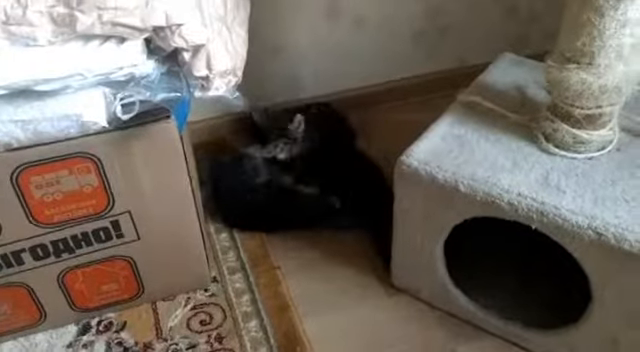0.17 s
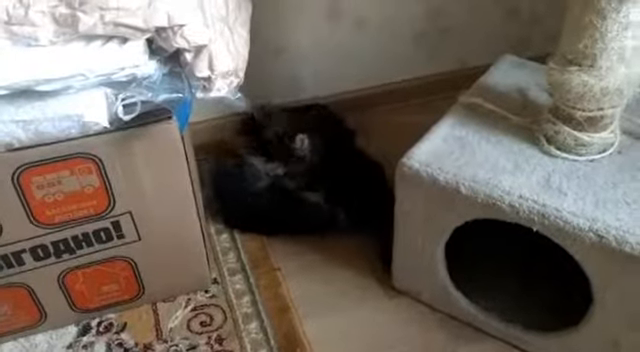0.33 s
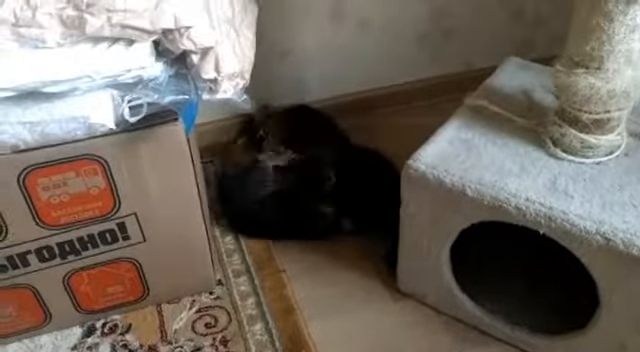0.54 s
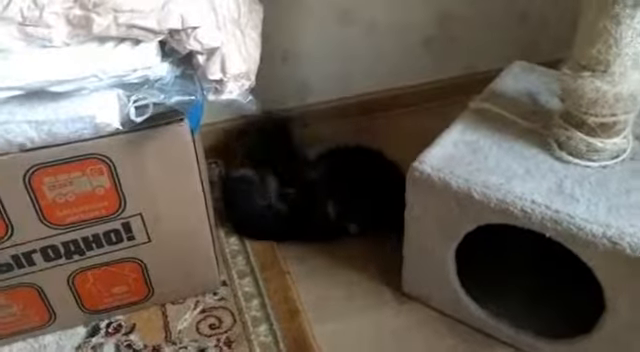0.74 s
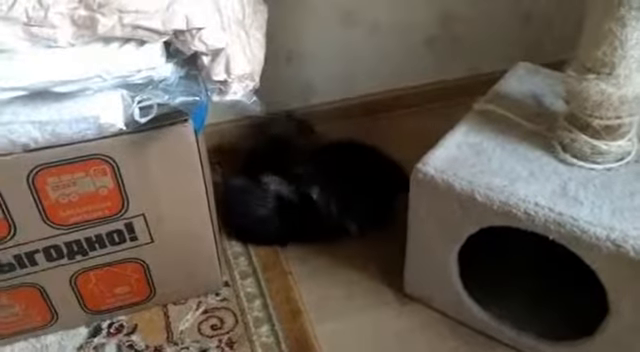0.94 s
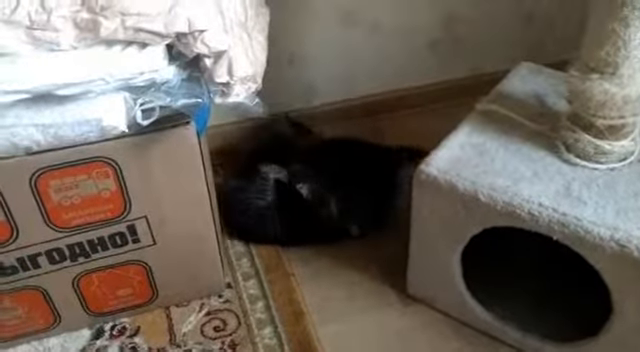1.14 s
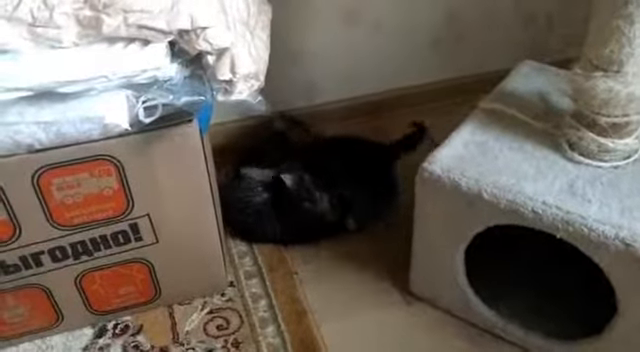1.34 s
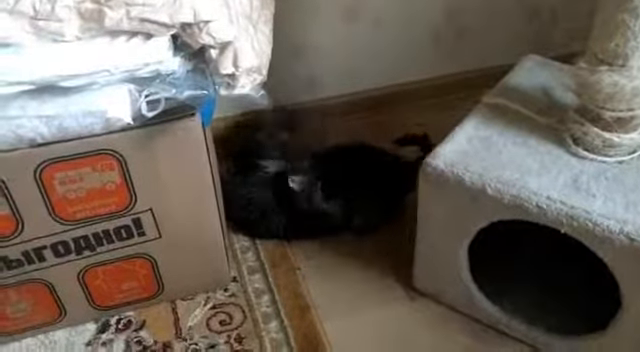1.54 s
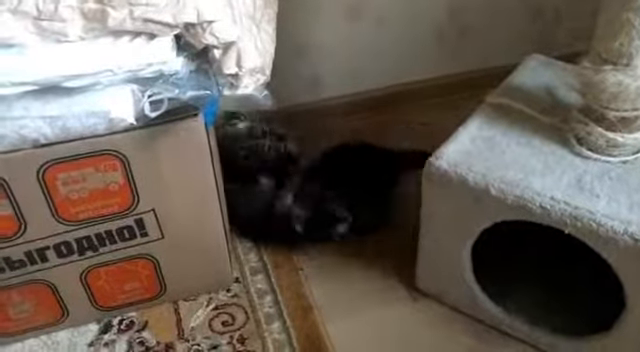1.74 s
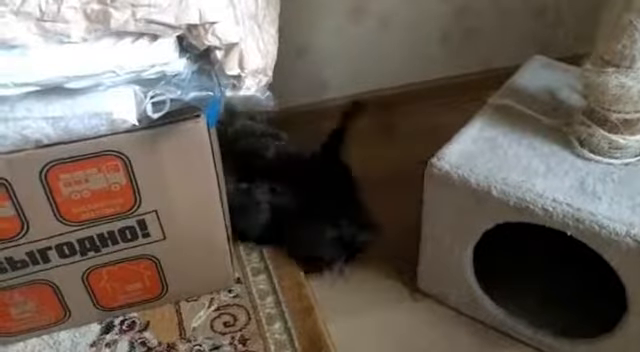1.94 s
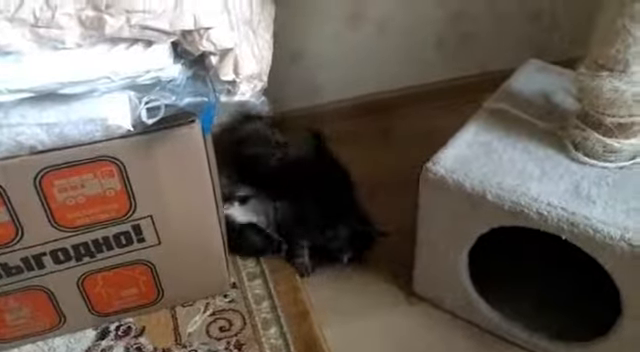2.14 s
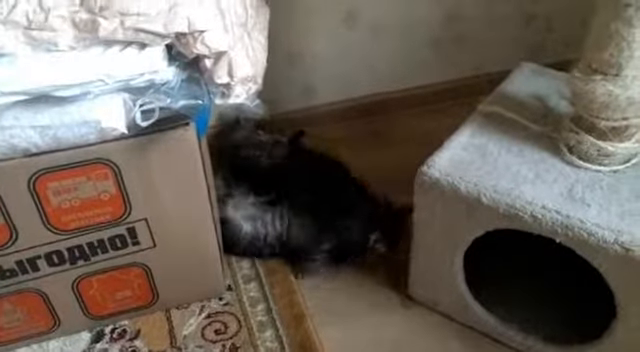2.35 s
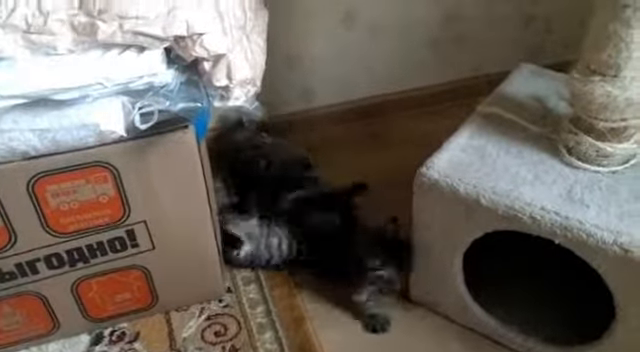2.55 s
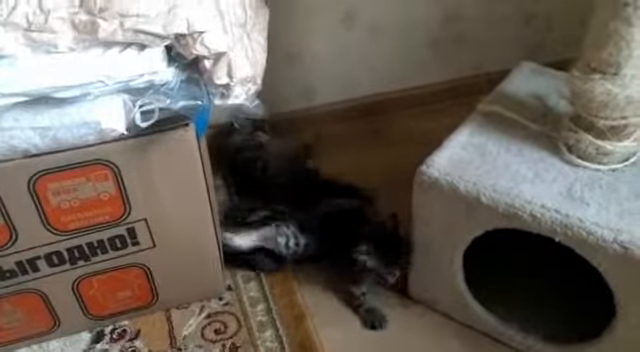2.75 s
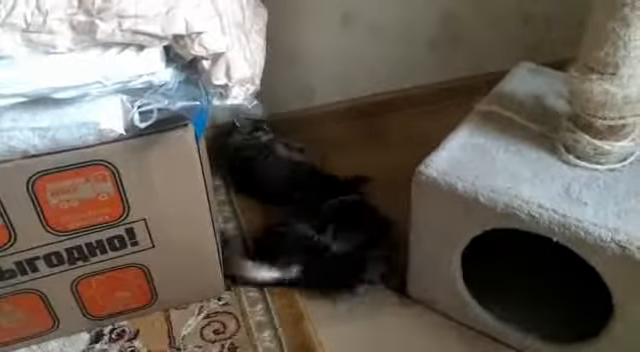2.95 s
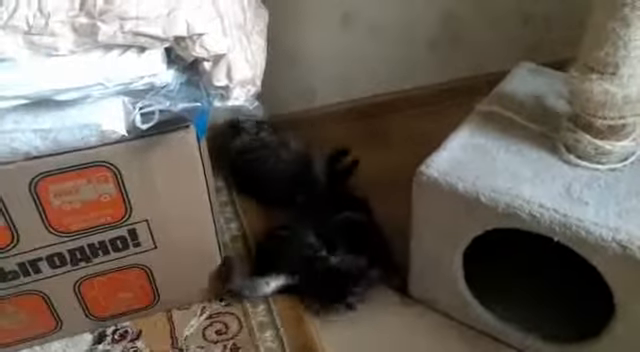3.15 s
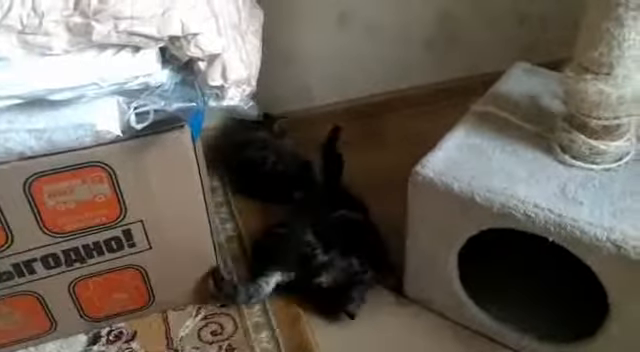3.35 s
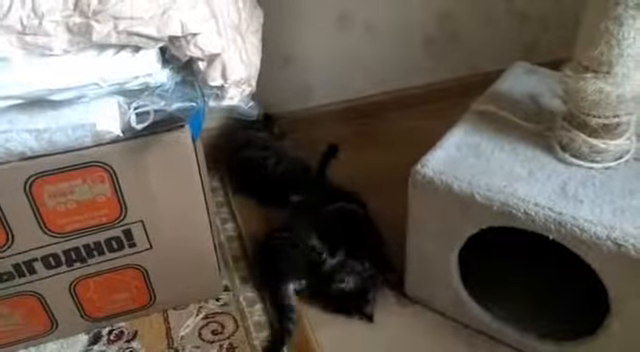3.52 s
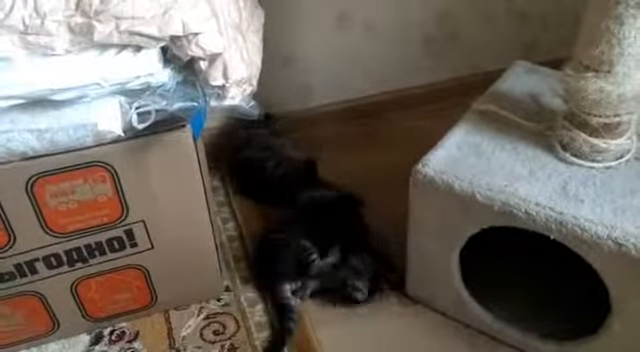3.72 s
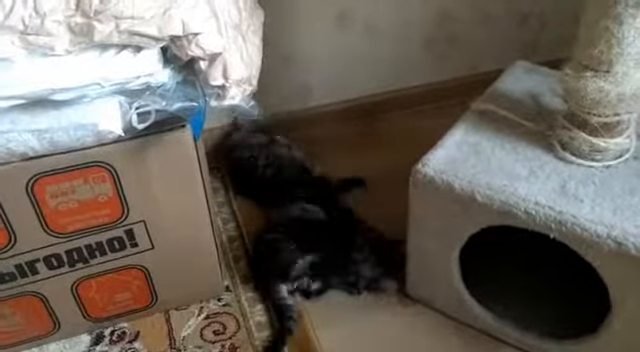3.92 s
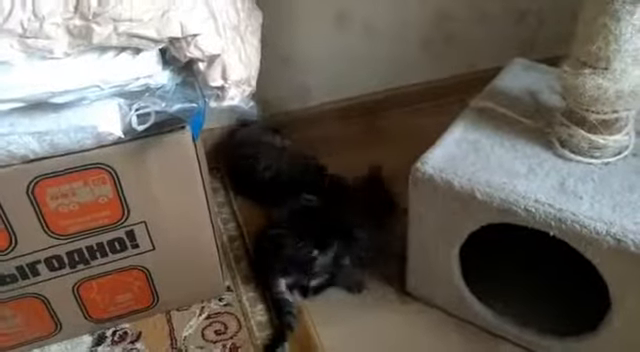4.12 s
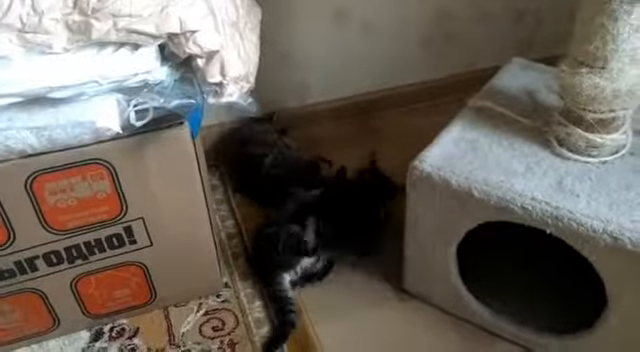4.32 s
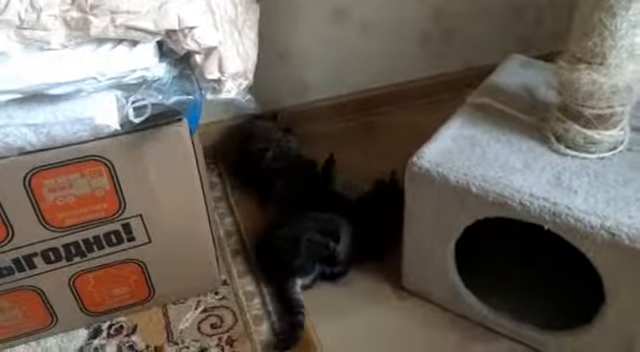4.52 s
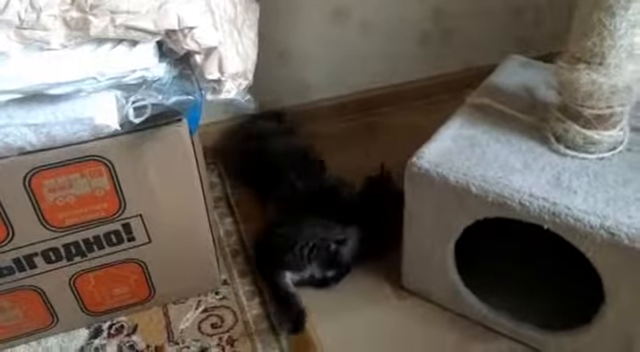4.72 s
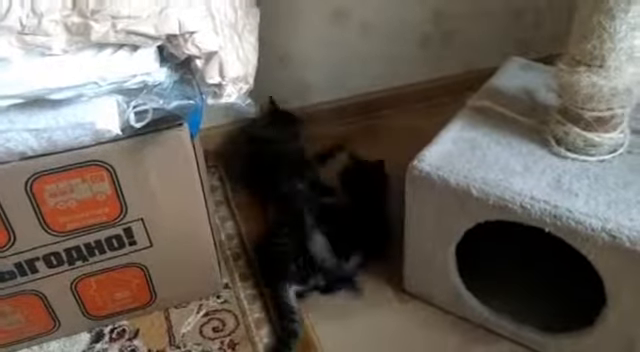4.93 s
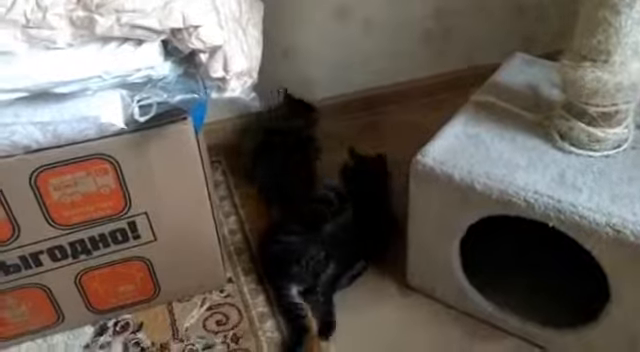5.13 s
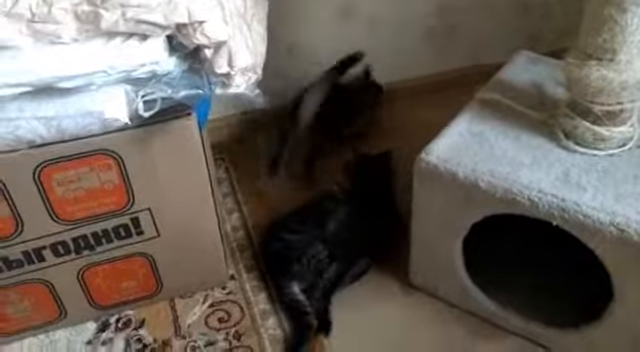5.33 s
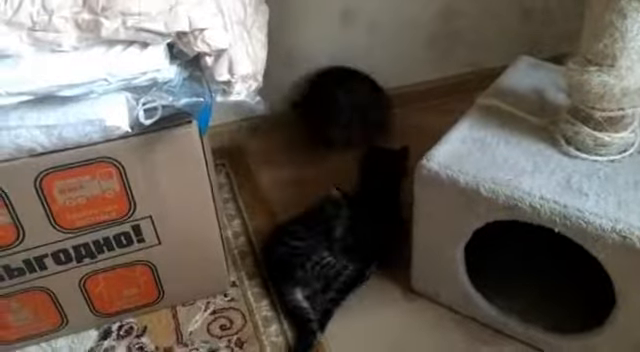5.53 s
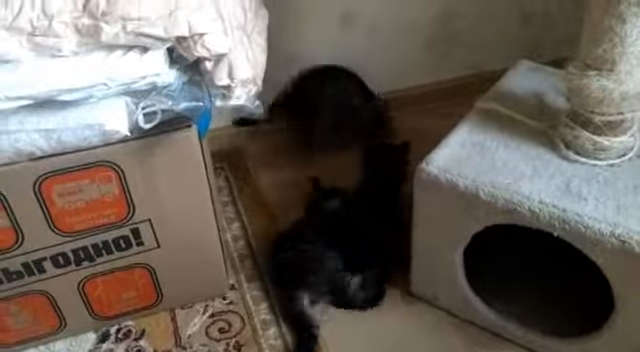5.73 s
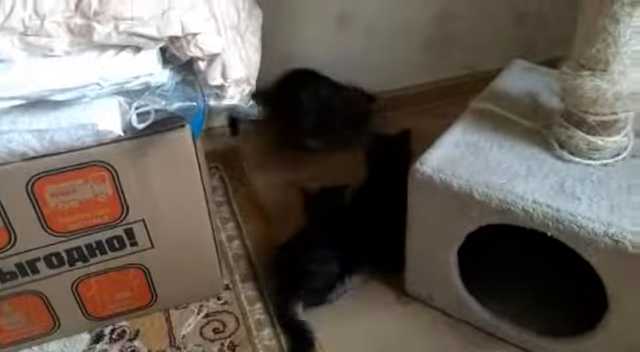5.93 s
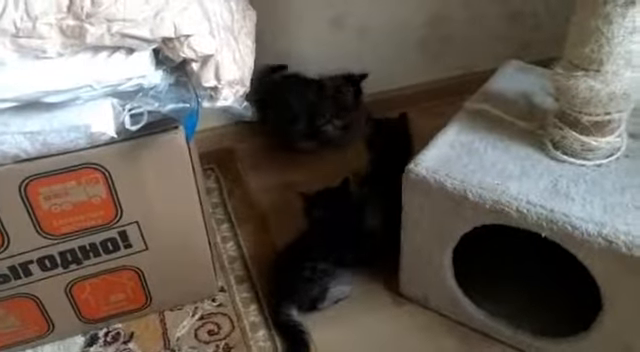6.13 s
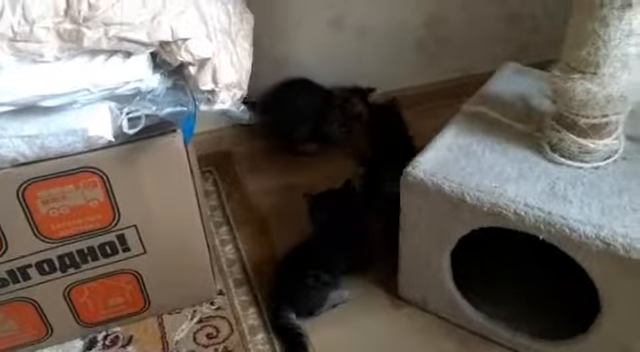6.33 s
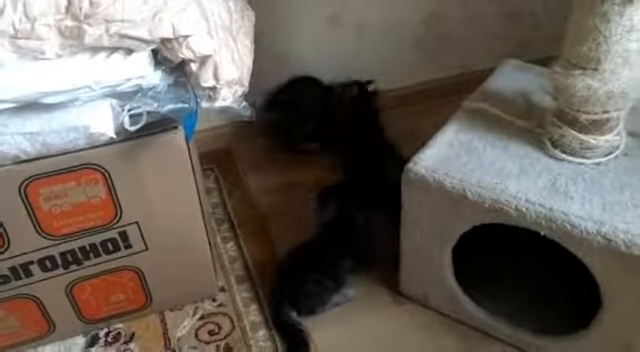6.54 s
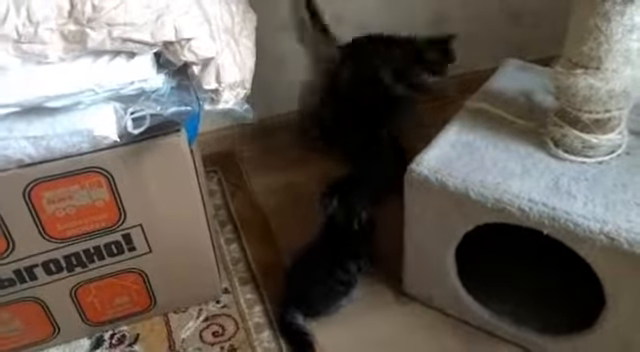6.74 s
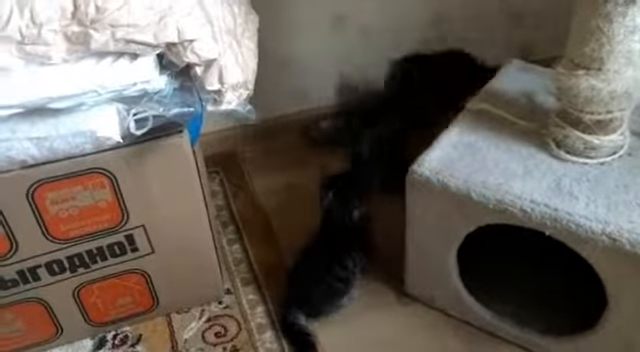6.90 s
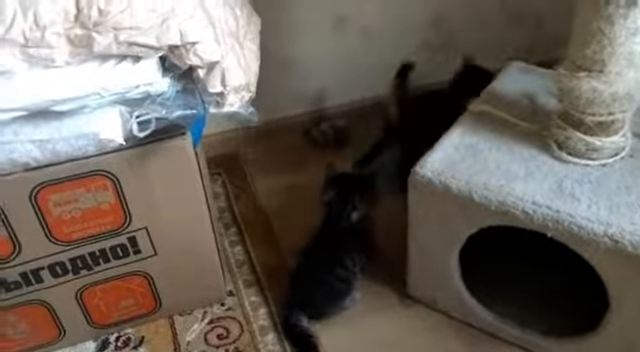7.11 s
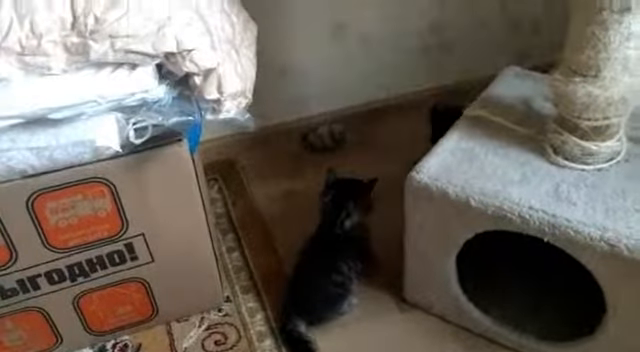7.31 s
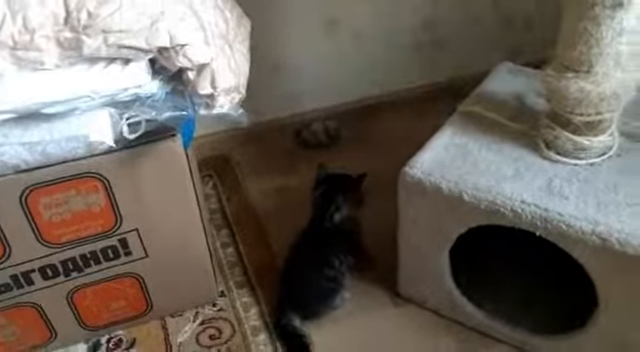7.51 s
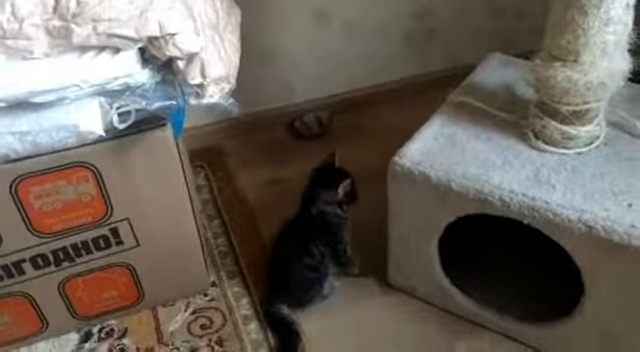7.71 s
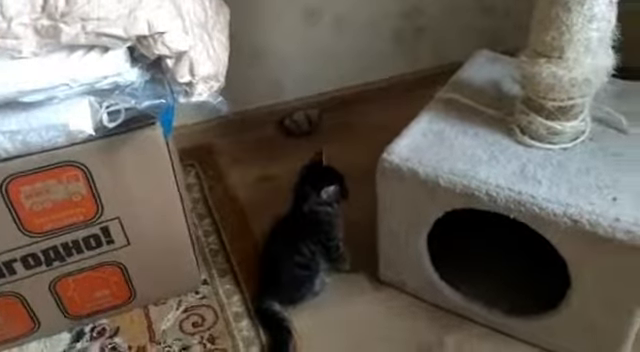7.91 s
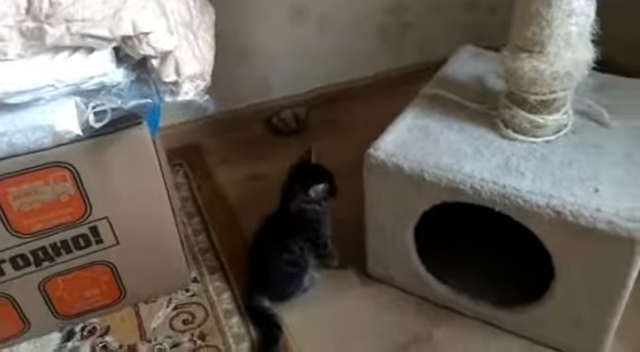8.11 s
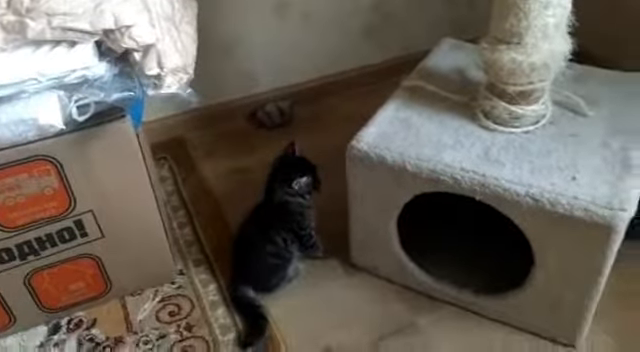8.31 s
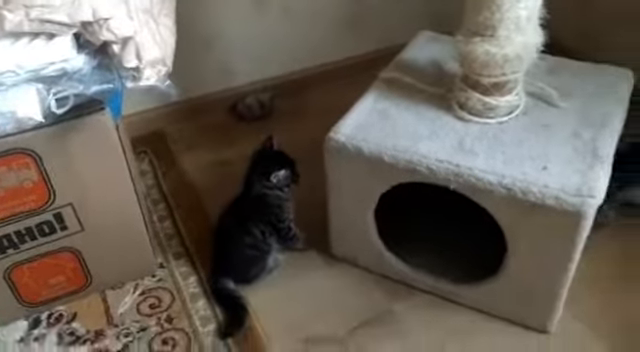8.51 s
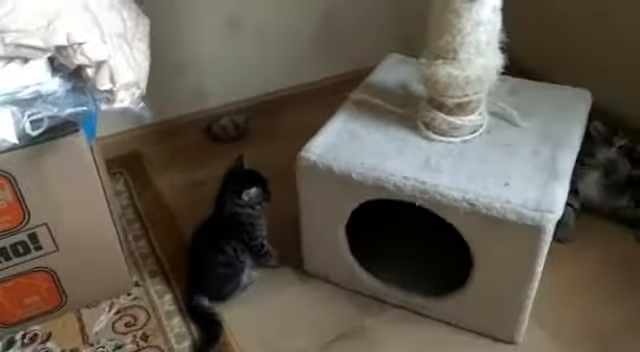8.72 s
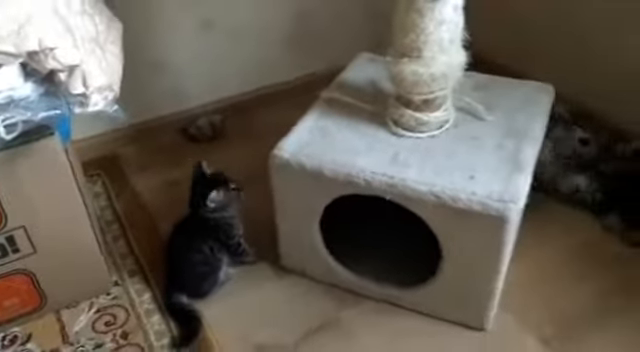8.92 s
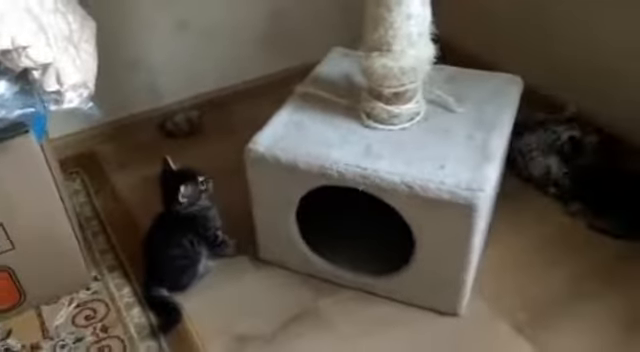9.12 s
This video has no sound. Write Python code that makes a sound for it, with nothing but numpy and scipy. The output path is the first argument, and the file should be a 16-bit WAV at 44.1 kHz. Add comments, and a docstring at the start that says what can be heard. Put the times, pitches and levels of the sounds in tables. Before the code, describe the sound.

Light claws tick and small paws thump on hard flooring as kittens tussle in a quiet live room, busiest in a late scramble.

```python
"""A low wavering hum, steady hiss and a tiny once-a-second tick run throughout, under two kittens wrestling
on a laminate floor: claws tick, feet scuff, hard things knock, paws thump. Early on come a faint squeal
and one low double thump of a body flopping over. Fur rustle grows with the density of contacts.
Contacts are shaped noise or impulses through resonators, each with a small, fairly live room's tail."""
import sys
import numpy as np
from scipy import signal
from scipy.fft import rfft, irfft, next_fast_len
from scipy.io import wavfile
from scipy.ndimage import uniform_filter1d

SR = 44100
rng = np.random.default_rng(int(sys.argv[2]) if len(sys.argv) > 2 else 0)


def materialize(psi):
    """Save the field psi as 16-bit PCM at rate SR to the path in sys.argv[1].

    A 1-D psi becomes a single channel; in a 2-D psi each row is a channel.
    """
    bounded = np.clip(np.atleast_2d(psi).T, -1, 1)
    quanta = np.round(bounded * 32767).astype(np.int16)
    wavfile.write(sys.argv[1], SR, quanta)


N = 403956


def undb(db):
    """Decibels to amplitude gain."""
    return 10 ** (np.asarray(db) / 20)


def seconds(length_s):
    """Time axis of the given length."""
    return np.arange(int(length_s * SR)) / SR


def lookup(points, hz):
    """Read (Hz, value) points on a log-frequency axis."""
    point_hz, value = np.transpose(points)
    return np.interp(np.log(np.maximum(hz, 1)), np.log(point_hz), value)


def colour(x, points):
    """Filter x by a curve of (Hz, dB) points."""
    size = next_fast_len(len(x))
    hz = np.arange(size // 2 + 1) * SR / size
    return irfft(rfft(x, size) * undb(lookup(points, hz)), size)[:len(x)]


def resonate(x, hz, q):
    """One resonance, gain 1 at its centre; Q is at least 0.3."""
    w = 2 * np.pi * min(hz, SR / 2 - 2000) / SR
    a = np.sin(w) / (2 * max(q, 0.3))
    return signal.lfilter([a, 0, -a], [1 + a, -2 * np.cos(w), 1 - a], x)


def unit(x):
    """Scale to rms 1."""
    return x / np.sqrt(np.mean(x ** 2))


def crest(x, db, window_s):
    """Scale so that the loudest window has the given rms level."""
    window = max(int(window_s * SR), 2)
    power = uniform_filter1d(x ** 2, window, mode="constant")
    return x * undb(db) / np.sqrt(power.max())


def walk(rate_hz):
    """Slow smoothed random curve with a spread near 1."""
    k = int(SR / rate_hz)
    steps = np.repeat(rng.standard_normal(N // k + 1), k)
    return unit(uniform_filter1d(uniform_filter1d(steps, k), k)[:N])


def grains(size, spread_db):
    """Dense tiny slips, a few much stronger than the rest."""
    boost = np.minimum(rng.exponential(size=size), 2 * np.pi)
    return unit(rng.standard_normal(size) * undb(spread_db * boost))


def add(out, start_s, x):
    """Mix x in at the given time."""
    i = max(int(start_s * SR), 0)
    out[i:i + len(x)] += x[:max(N - i, 0)]


# room decay: hz, t60_s
ROOM_DECAY = [(120, 0.34), (400, 0.35), (1200, 0.4), (4500, 0.46), (13000, 0.22)]
# reverberation colour: hz, level_db
ROOM_TINT = [(100, 11.5), (500, 5.5), (1500, 1), (4500, 3), (9000, 1), (15000, 11.5)]


def room_tail(onset_s=0.0054):
    """Diffuse echoes of unit energy; each band decays at its own rate, the top band fastest."""
    t = seconds(0.5)
    spectrum = rfft(colour(rng.standard_normal(len(t)), ROOM_TINT))
    hz = np.arange(len(spectrum)) * SR / len(t)
    centres_hz, t60s = np.transpose(ROOM_DECAY)
    tail = 0
    for share, t60_s in zip(np.eye(len(centres_hz)), t60s):
        band = irfft(spectrum * lookup(np.c_[centres_hz, share], hz), len(t))
        tail = tail + band * undb(-60 * t / t60_s)
    # silent until onset_s, full at twice that
    tail = tail * np.clip(t / onset_s - 1, 0, 1)
    return tail / np.linalg.norm(tail)


def in_room(x, wet_db):
    """Direct sound plus its reverberation."""
    response = undb(wet_db) * room_tail()
    response[0] += 1
    return signal.fftconvolve(x, response)


# low hum level, before HUM_TRIM_DB: time_s, level_db
HUM_LEVEL = [(0.0, -76), (0.81, -64), (1.1, -57.5), (1.55, -75), (2.55, -58), (2.78, -66), (4.8, -55.5),
             (5.36, -61), (5.64, -60), (5.84, -69), (6.84, -68), (9.16, -67)]
# still room and microphone hiss, relative spectrum: hz, level_db_per_hz
HISS_SPECTRUM = [(30,-18), (48,-4), (66,3), (86,-11), (135,-6), (200,-21), (380,-26), (700,-29),
                 (1800,-32.5), (4500,-38), (8000,-42), (10600,-31), (14200,-29), (15800,-33)]
HUM_HZ, HUM_TRIM_DB, HISS_DB = 72.9, -2, -60


def background(drone_db=-66, drone_hz=127):
    """Steady noise hiss and rumble, a sine hum wavering in pitch and level, a narrow noise drone above."""
    phase = 2 * np.pi * np.cumsum(HUM_HZ + 2.62 * walk(7.5)) / SR
    hum_db = np.interp(np.arange(N) / SR, *np.transpose(HUM_LEVEL)) + HUM_TRIM_DB + 2 * walk(8.6)
    hum = np.sqrt(2) * np.sin(phase) * undb(hum_db)
    drone = unit(resonate(resonate(rng.standard_normal(N), drone_hz, 2.8), drone_hz, 2.8))
    hiss = unit(colour(rng.standard_normal(N), HISS_SPECTRUM))
    return hum + undb(drone_db) * drone + undb(HISS_DB) * hiss


# fur rubbing on fur, carpet and cardboard: hz, level_db
FUR_SPECTRUM = [(150, 9), (400, 6.5), (1000, -1), (2500, -6), (4600, -7), (7500, -8.5), (12000, -7.5),
                (15500, -16)]
# calm level, rise per doubling of (1 + bustle), time over which contacts blend
CALM_DB, BUSTLE_DB, BUSTLE_S = -67.5, 2.5, 0.32


def tussle(flutter_db=1.0):
    """Two small bodies rolling over each other: a restless rustle, louder as contacts crowd together."""
    contacts, span = np.zeros(N), int(BUSTLE_S * SR)
    for time_s, *_ in PAW_LANDINGS + CLAW_STRIKES + FOOT_SCUFFS:
        add(contacts, time_s, np.ones(1))
    per_second = SR * uniform_filter1d(uniform_filter1d(contacts, span), span)
    bustle = np.log2(1 + per_second * BUSTLE_S)
    rustle = unit(colour(grains(N, 2.53), FUR_SPECTRUM))
    return rustle * undb(CALM_DB + BUSTLE_DB * bustle + flutter_db * walk(30))


def phone_ticks(db=-46, hz=13500, q=2.3, click_db=-7):
    """The phone's electronics leave a tiny high tick about once a second, and one out of step."""
    out, impulse = np.zeros(N), 1. * (seconds(0.004) == 0)
    ring, click = unit(resonate(impulse, hz, q)), unit(resonate(impulse, 15000, 0.2))
    tick = crest(ring + undb(click_db) * click, db, 0.001)
    for start_s in [*np.arange(0.0296, N / SR, 1.00415), 3.6188]:
        add(out, start_s, tick)
    return out


def claw(db, hz, q, length_s, wet_db, crack_db=-15, snap_db=11):
    """One claw snaps down first and the other tips follow within milliseconds: a bright, ragged tick."""
    t = seconds(0.069)
    tips = grains(len(t), 5.0) * np.exp(-(t / length_s) ** 2)
    tips[0] += undb(snap_db)
    ring = unit(resonate(resonate(tips, hz, q * 0.79), hz, q * 0.79))
    crack = unit(resonate(tips, 7300, 1.0))
    return crest(in_room(ring + undb(crack_db) * crack, wet_db), db, 0.002)


# claws striking the floor: start_s, level_db, pitch_hz, q (before claw's 0.79 factor), room_db
CLAW_STRIKES = [(0.346,-58,2470,1,-5), (0.7365,-49,4600,0.9,0.5), (1.514,-44.5,4240,1.3,-3.5),
                (3.186,-52,4550,0.62,0), (3.909,-42,3200,0.35,-6), (4.22,-53,3000,0.57,-10),
                (4.508,-52,3700,1.6,-3), (4.698,-55,4400,0.7,-2), (4.882,-47,2790,1.2,4),
                (5.4102,-45,10500,0.73,-2), (5.432,-40,6300,0.87,-6), (5.528,-37.5,4740,2,-11),
                (5.5414,-54,1800,0.84,-15), (5.628,-36,5000,1.35,-6.5), (5.667,-38.5,4730,1.1,-3),
                (5.8027,-41,8000,0.28,-0.5), (5.885,-55,2110,1.9,-5), (6.758,-44,10000,0.68,-8),
                (6.968,-39.5,2000,0.56,3.5), (7.001,-40.5,2600,1,-15), (7.168,-47.5,4030,1.06,2),
                (7.2401,-36.5,4060,1.1,-0.5), (7.308,-45,4030,0.82,-1), (7.3555,-31.5,4500,0.2,2),
                (7.5237,-33,5300,0.58,-2), (7.673,-46,6660,0.71,-1), (7.727,-41,2500,1.1,0),
                (7.926,-51.5,4730,1.2,-9), (8.242,-46.5,2920,0.67,-5.5), (8.365,-47.5,4400,0.38,6.5),
                (8.451,-46,2600,2.3,-5)]
CLAW_LENGTH_S = 0.0078  # tips of one foot come down, decay to 1/e


def claws():
    """Claw tips tick on the floor."""
    out = np.zeros(N)
    for start_s, db, hz, q, wet_db in CLAW_STRIKES:
        add(out, start_s, claw(db, hz, q, CLAW_LENGTH_S, wet_db))
    return out


def scuff(db, hz, q, half_s, body_db=-13, wet_db=-4, catch_db=3, trim_db=-3):
    """A foot slides, catching and slipping; the lower the Q, the more the surface beneath rubs along."""
    t = seconds(4 * half_s)
    # grip changes every 3 ms
    catches = np.repeat(rng.standard_normal(len(t)), int(0.003 * SR))[:len(t)]
    slips = grains(len(t), 1.9) * undb(catch_db * catches) * np.exp(-(t / half_s - 2) ** 2)
    rub = unit(resonate(resonate(slips, hz, q), hz, q / 4))
    body = unit(resonate(slips, 800, 0.31))
    return crest(in_room(rub + undb(body_db) / q * body, wet_db), db + trim_db, 0.019)


# feet and fur sliding: peak_s, level_db (before scuff's trim), pitch_hz, q, half_s
FOOT_SCUFFS = [(0.364,-57.5,5300,1.4,0.0089), (0.599,-56.5,5000,2.2,0.009), (1.03,-54.5,4630,2.4,0.036),
               (1.191,-62.5,4260,3.5,.021), (1.302,-62,4150,4.3,0.013), (1.53,-49.5,4200,4.5,0.0079),
               (1.589,-51,4260,3.2,.012), (1.713,-58,4400,1.2,0.019), (1.839,-54.5,5260,1.1,0.0097),
               (1.941,-53,4200,3.6,0.022), (2.123,-61,2490,0.92,.006), (2.475,-63,9050,0.66,0.038),
               (2.538,-58,3500,0.46,0.037), (2.928,-55,5130,2.9,.01), (3.202,-53.5,4400,2.4,.013),
               (3.808,-58.5,5000,6,0.011), (4.255,-53,3430,0.1,0.02), (4.433,-53,4360,0.85,0.037),
               (4.904,-49.5,3970,1.8,.016), (5.076,-51,2980,4.5,0.014), (5.078,-51.5,6000,0.37,0.012),
               (5.133,-56.5,4530,1.8,.018), (5.341,-53,4530,3.7,.012), (5.396,-53,5160,1.4,0.0098),
               (5.42,-45,5800,0.6,0.0078), (5.556,-44.5,2500,0.12,0.022), (5.624,-47,4660,2.1,0.016),
               (5.942,-49,4600,0.32,0.01), (6.117,-56.5,5850,1.3,0.0093), (6.543,-56.5,4500,1.6,0.015),
               (6.628,-51.5,4840,2.4,0.017), (6.785,-52.5,6270,0.44,0.014), (6.842,-53,6000,1.5,0.011),
               (7.336,-40.5,3830,0.26,0.019), (7.363,-41,2820,2.4,.0065), (7.376,-37.5,6200,0.7,.013),
               (7.751,-40.5,4900,1.1,0.021), (7.817,-50.5,4200,0.98,.011), (8.02,-51,6640,0.75,0.037),
               (8.073,-49.5,6760,0.63,0.022), (8.157,-46,5300,0.9,0.014), (8.9,-45.5,5340,0.58,.02),
               (9.076,-49.5,6000,0.67,0.017)]


def scuffs():
    """Feet and fur slide, swelling to a peak at the listed time."""
    out = np.zeros(N)
    for peak_s, db, hz, q, half_s in FOOT_SCUFFS:
        add(out, peak_s - 2 * half_s, scuff(db, hz, q, half_s))
    return out


def knock(db, hz, q, wet_db, contact_s=0.007, overtone_db=-13, trim_db=-1, linger_db=-20, linger_q=14):
    """A hard contact chatters briefly and rings a resonance with a weaker overtone; high Q rings on."""
    t = seconds(0.16)
    blow = grains(len(t), 5.06) * np.exp(-t / contact_s)
    blow[0] += 9
    ring = unit(resonate(resonate(blow, hz, q), hz, 1.0))
    overtone = unit(resonate(blow, hz * 1.3, 1.3))
    linger = q * unit(resonate(blow, hz, q * linger_q))
    mix = ring + undb(overtone_db) * overtone + undb(linger_db) * linger
    return crest(in_room(mix, wet_db), db + trim_db, 0.0037)


# floor, skirting and furniture knocked: start_s, level_db (before knock's trim), pitch_hz, q, room_db
HARD_KNOCKS = [(0.737,-53.5,790,0.34,-1), (3.91,-39,2260,0.63,-9), (5.623,-40.5,970,0.29,4.5),
               (6.727,-52.5,1250,2.3,-2), (6.861,-41,975,0.64,-1.5), (7.0,-28,988,3.8,-2),
               (7.255,-38.5,732,6,1), (7.455,-50,560,2.3,2), (7.542,-38,505.5,7.9,-4),
               (7.726,-47,2260,4,-6), (8.376,-43.5,727,3.5,2.5), (8.451,-36,1587,5.1,-2)]


def knocks():
    """Hard things get knocked."""
    out = np.zeros(N)
    for start_s, *row in HARD_KNOCKS:
        add(out, start_s, knock(*row))
    return out


# floorboard modes, relative: hz, level_db (before a random gain per blow), t60_s
BOARD_MODES = [(95.7, 27.5, 0.092), (125, 3.5, 0.09), (240, 11.5, 0.19), (255, 4, 0.23), (335, 7.5, 0.042),
               (395, 7, 0.28), (500, 14.5, 0.046), (666, 12, 0.081), (920, -26, 0.044)]
# nearest walls: delay_s (before jitter), level_db (plus the room share)
WALL_ECHOES = [(0.01, -5.5), (0.024, -6.5)]


def thump(db, hz, cycles, wet_db, ring_db=-3, tail_db=-3):
    """A soft pad pushes the floor for a cycle or a few; boards ring and near walls throw it back."""
    t = seconds(0.25)
    push = resonate(resonate(1. * (t == 0), hz, cycles), hz, cycles)
    ring = 0
    for mode_hz, mode_db, t60_s in BOARD_MODES:
        mode_q = np.pi * mode_hz * t60_s / np.log(1000)
        ring = ring + undb(mode_db) * rng.uniform(0.28, 3.1) * resonate(push, mode_hz, mode_q)
    blow = unit(push) + undb(ring_db) * unit(ring)
    heard = blow.copy()
    for delay_s, echo_db in WALL_ECHOES:
        lag = int(delay_s * SR * (1 + 0.068 * rng.standard_normal()))
        heard[lag:] += undb(echo_db + wet_db) * blow[:-lag]
    return crest(in_room(heard, wet_db + tail_db), db, 0.0118)


# paws on the boards: start_s, level_db, push_pitch_hz, tap_db (against push, before knock's trim)
PAW_LANDINGS = [(0.848,-43.5,300,-8.5), (1.907,-42,380,-11.5), (2.017,-50.5,260,-1.5), (2.454,-51,380,3),
                (2.558,-44,335,-7.5), (2.634,-48,355,-23), (3.911,-51,272,6), (4.391,-45,342,-4),
                (4.882,-50,392,1), (5.097,-44,240,-16), (5.428,-35,260,-6), (5.683,-33.5,245,-20.5),
                (6.556,-46.5,284,-7), (6.632,-50,320,-13), (6.885,-41,287,-23), (6.967,-37.5,226,0),
                (7.002,-40,238,-14), (7.120,-39.5,270,-30), (7.160,-39,260,-12), (7.255,-36,330,-5.5),
                (7.326,-38,266,-9.5), (7.455,-33.5,300,-17.5), (7.524,-31,325,-14.5), (7.695,-42,273,-14),
                (7.726,-35,326,-8), (7.848,-42,308,-17), (8.003,-48,272,-6.5), (8.186,-55.5,307,-30),
                (8.366,-38,285,-11), (8.384,-42,200,-19)]
# room share of the thumps, interpolated: time_s, room_db
PAW_ROOM = [(2.5,-5), (4.4,0.5), (7.0,2), (7.55,0)]
# push length at PUSH_HZ; lower pitches get fewer cycles, higher ones more
PUSH_CYCLES, PUSH_HZ, PUSH_SLOPE = 1.35, 300, 1.24
# ordinary tap; dB of push length per dB of softer tap
USUAL_TAP_DB, PUSH_SOFTNESS = -9.5, 0.23
TAP_HZ, TAP_Q, TAP_ROOM_DB = 946, 1.05, -0.5
# slide: peak delay, level against tap_db (before scuff's trim), pitch, sharpness, half length
SLIDE_S, SLIDE_DB, SLIDE_HZ, SLIDE_Q, SLIDE_HALF_S = 0.027, -12.5, 4400, 0.56, 0.015


def paws():
    """Each landing thumps the boards, taps the laminate and slides on a little."""
    out = np.zeros(N)
    for start_s, db, hz, tap_db in PAW_LANDINGS:
        softness = undb(PUSH_SOFTNESS * (USUAL_TAP_DB - tap_db))
        cycles = PUSH_CYCLES * (hz / PUSH_HZ) ** PUSH_SLOPE * softness
        wet_db = np.interp(start_s, *np.transpose(PAW_ROOM))
        add(out, start_s, thump(db, hz, cycles, wet_db))
        add(out, start_s, knock(db + tap_db, TAP_HZ, TAP_Q, TAP_ROOM_DB))
        slide = scuff(db + tap_db + SLIDE_DB, SLIDE_HZ, SLIDE_Q, SLIDE_HALF_S)
        add(out, start_s + SLIDE_S - 2 * SLIDE_HALF_S, slide)
    return out


SQUEAL_S, SQUEAL_LENGTH_S, SQUEAL_RAMP_S, SQUEAL_FADE_DB_PER_S = 2.105, 0.31, 0.013, 11
SQUEAL_DB, SQUEAL_HZ, SQUEAL_ACCENT_DB, SQUEAL_SETTLE_S = -73, 2260, 5, 0.025


def squeal(q=13):
    """A thin, broken whistle of narrow noise that starts with an accent and fades."""
    t = seconds(SQUEAL_LENGTH_S)
    noise = rng.standard_normal(len(t))
    whistle = unit(resonate(resonate(noise, SQUEAL_HZ, q), SQUEAL_HZ, 2.0))
    db = SQUEAL_DB + SQUEAL_ACCENT_DB * np.exp(-t / SQUEAL_SETTLE_S) - SQUEAL_FADE_DB_PER_S * t
    return whistle * undb(db) * np.clip(np.minimum(t, t[-1] - t) / SQUEAL_RAMP_S, 0, 1)


# a body flopping over, a double thump: start_s, level_db, pitch_hz
BODY_FLOP = [(2.520,-38.5,168), (2.545,-46.5,95)]
FLOP_CYCLES, FLOP_ROOM_DB = 3.5, -5.5


def flop():
    """A body flopping over rocks the floor slowly: a low double thump of more cycles."""
    out = np.zeros(N)
    for start_s, db, hz in BODY_FLOP:
        add(out, start_s, thump(db, hz, FLOP_CYCLES, FLOP_ROOM_DB))
    return out


def scene():
    """All contacts over the quiet room."""
    out = background() + tussle() + phone_ticks()
    out += claws() + scuffs() + knocks() + paws() + flop()
    add(out, SQUEAL_S, squeal())
    return out[None]


def record(dry):
    """The phone drops the deepest bass and cuts the top of the band."""
    bass_cut = signal.butter(5, 43, "high", fs=SR, output="sos")
    top_cut = signal.ellip(8, 0.2, 70, 15700, fs=SR, output="sos")
    return signal.sosfilt(top_cut, signal.sosfilt(bass_cut, dry))


dry = scene()
out = record(dry)
materialize(out)
```